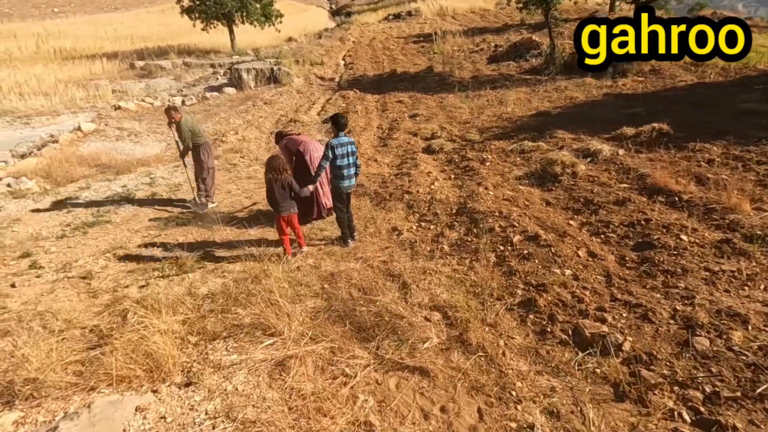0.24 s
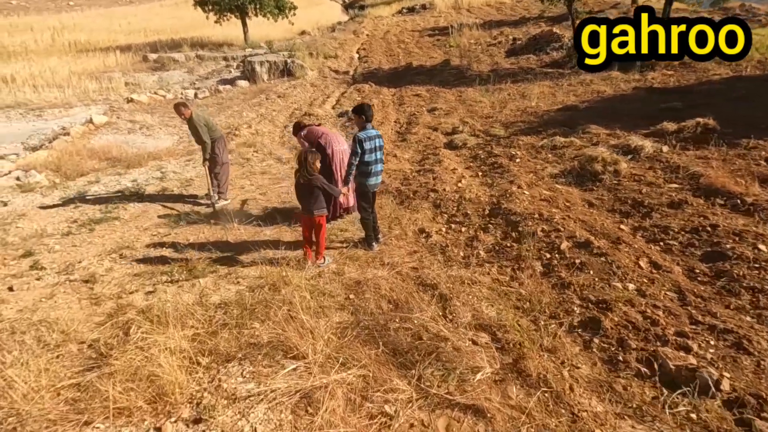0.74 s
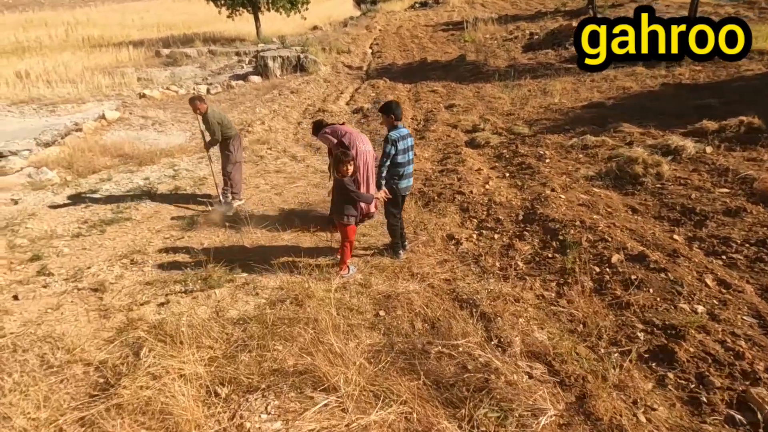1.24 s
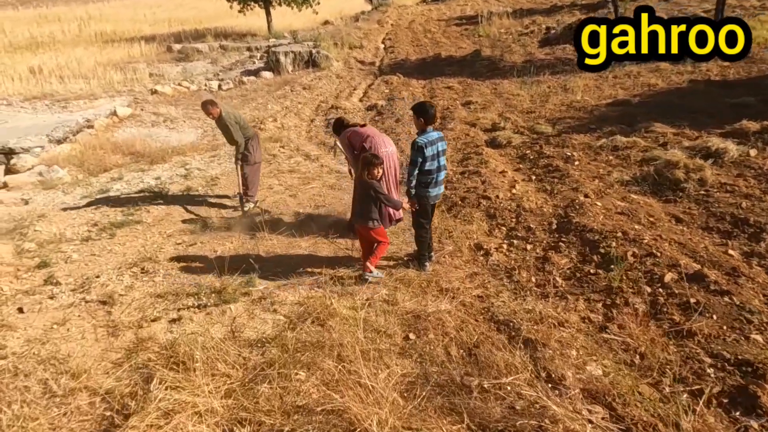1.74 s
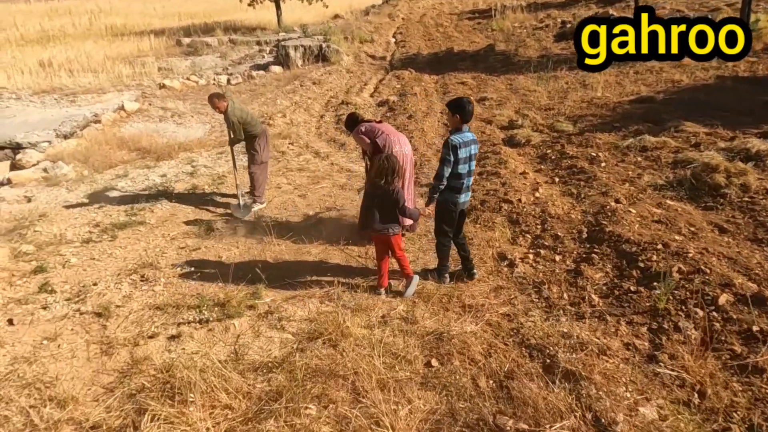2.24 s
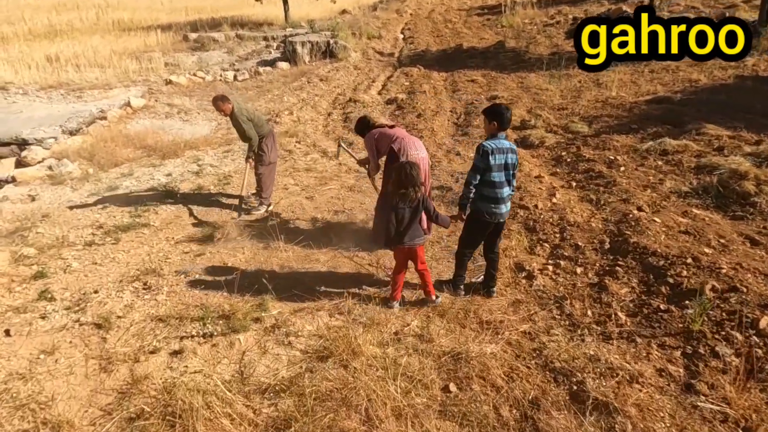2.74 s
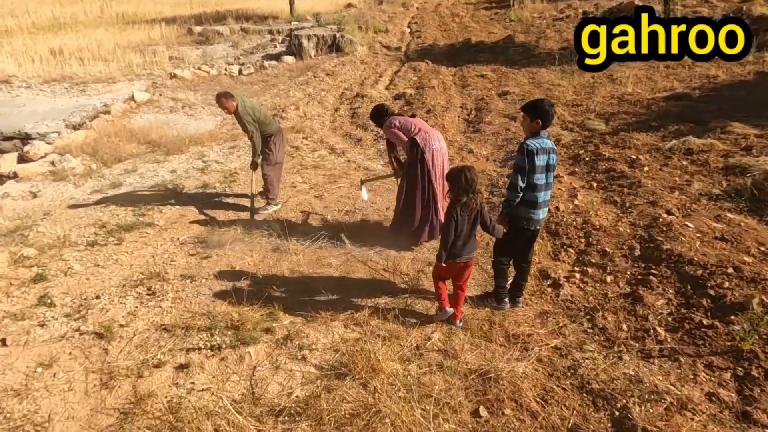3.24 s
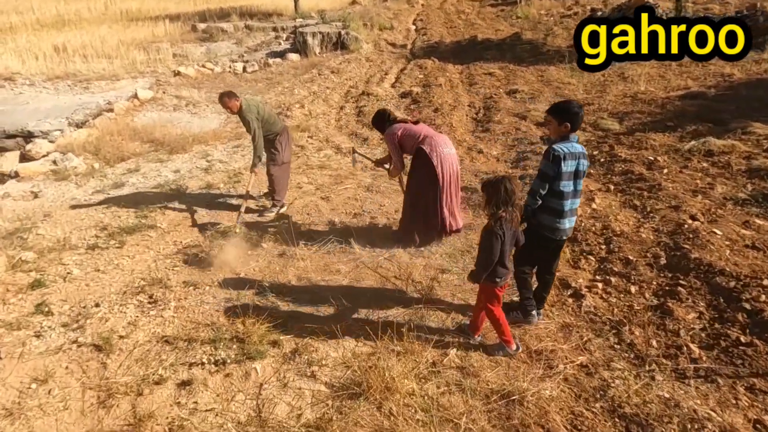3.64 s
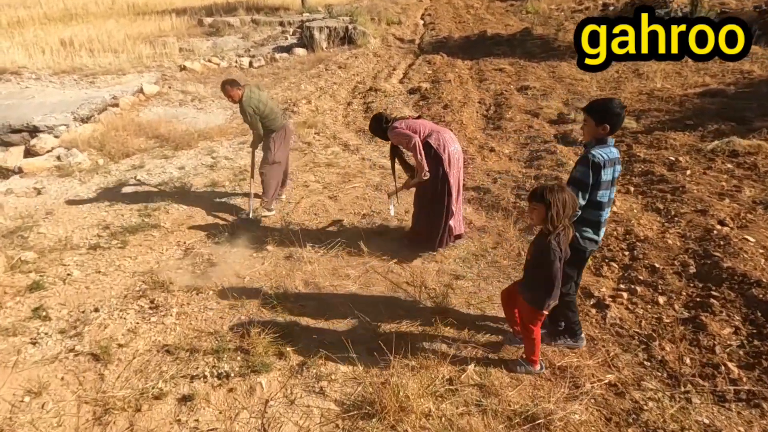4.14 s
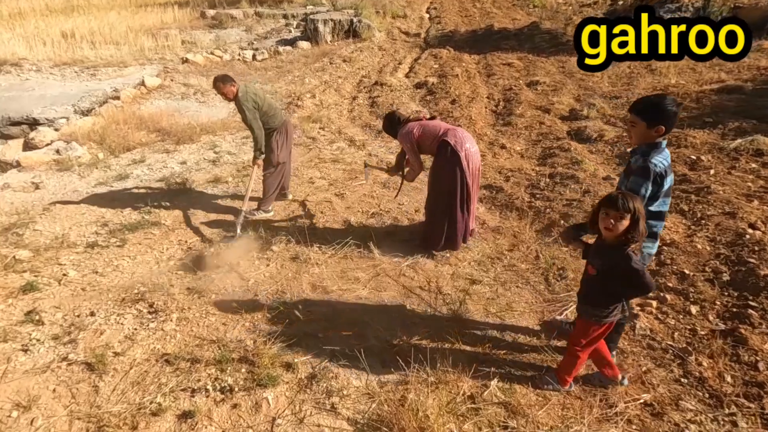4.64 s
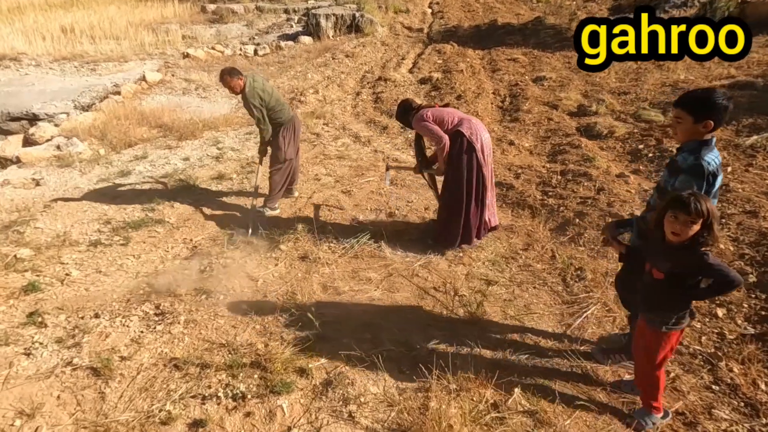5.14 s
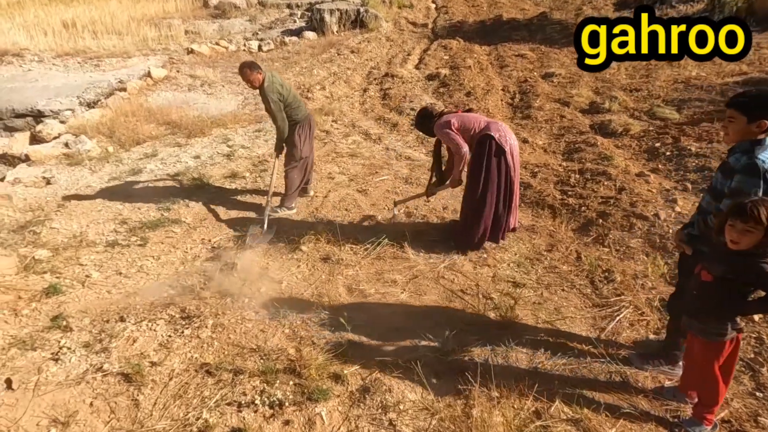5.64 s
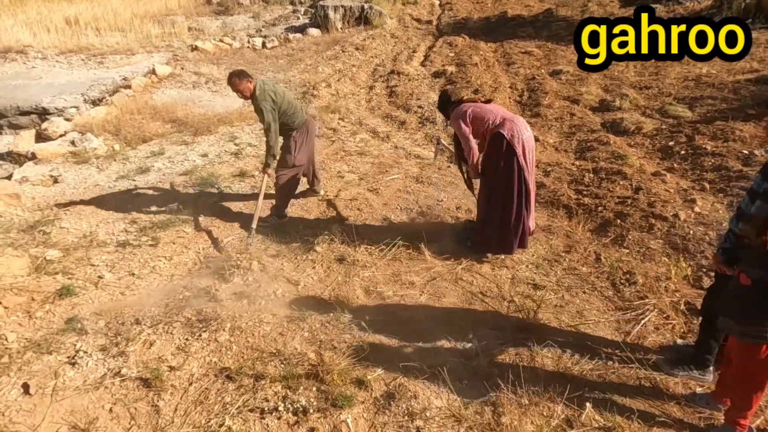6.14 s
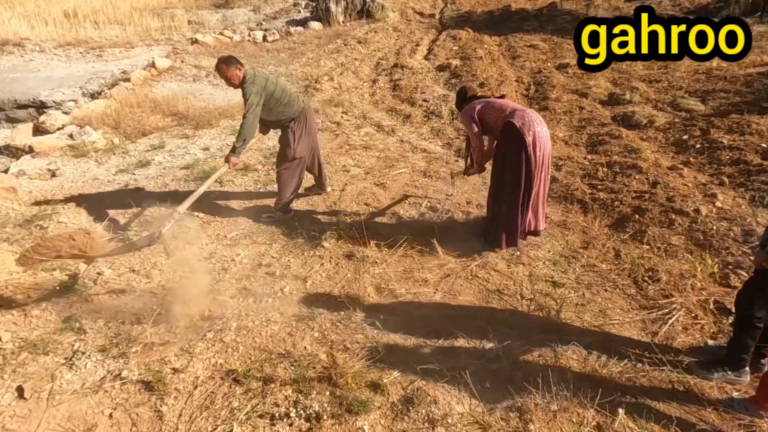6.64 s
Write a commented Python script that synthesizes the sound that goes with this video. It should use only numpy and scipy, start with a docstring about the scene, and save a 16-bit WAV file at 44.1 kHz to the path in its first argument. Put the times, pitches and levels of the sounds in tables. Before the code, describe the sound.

A shovel scrapes into dry stony soil while a hoe chops steadily beside it, with clinking stones and light wind.

```python
"""On an open slope in light wind, a shovel is thrust into dry stony soil and a hoe chops beside it.
Wind rumbles on the microphones and loose earth patters down. Grit and stones knock the steel
blades, which ring freely in the air but only briefly in soil. Each hoe chop crunches,
jolts the wooden shaft and thuds in the ground."""
import sys
import numpy as np
from scipy import signal
from scipy.fft import rfft, irfft, next_fast_len
from scipy.io import wavfile
from scipy.ndimage import uniform_filter1d

SR = 44100
rng = np.random.default_rng(int(sys.argv[2]) if len(sys.argv) > 2 else 0)


def pcm_store(signal):
    """Save signal as 16-bit PCM."""
    levels = np.round(np.clip(np.atleast_2d(signal), -1, 1) * 32767)
    wavfile.write(sys.argv[1], SR, levels.astype(np.int16).T)


N = 304290


def amp(db):
    """Turn decibels into a plain multiplier."""
    return 10 ** (np.asarray(db) / 20)


def evened(x):
    """Scale a signal to an average power of 1."""
    return x / np.sqrt(np.mean(x ** 2) + 1e-20)


def between(ends, share):
    """Slide from the first end (share 0) to the second (share 1)."""
    return ends[0] + (ends[1] - ends[0]) * share


def curve_at(points, hz):
    """Look up a pitch on a curve of (pitch, value) points."""
    pitches, values = np.transpose(points)
    return np.interp(np.log(hz + 1), np.log(pitches + 1), values)


def tone_filter(points, lo_hz=0, hi_hz=30000, size=4096):
    """A filter that follows a tone curve between a soft low edge and a soft high edge."""
    hz = np.fft.rfftfreq(size, 1 / SR) + 1
    gain = amp(curve_at(points, hz)) / np.sqrt((1 + (lo_hz / hz) ** 10) * (1 + (hz / hi_hz) ** 10))
    cepstrum = irfft(np.log(gain + 1e-6))
    cepstrum[1:size // 2] *= 2  # folded so that no sound comes before its cause
    cepstrum[size // 2 + 1:] = 0
    taps = irfft(np.exp(rfft(cepstrum)))
    return taps / np.linalg.norm(taps)


def ring(notes):
    """A tapped object's ring, from (pitch [Hz], level [dB], fade [s]); a fade is a drop of 60 dB."""
    t = np.arange(SR // 2) / SR
    taps = sum((-1) ** k * amp(db - 60 * t / max(fade, .002)) * np.sin(2 * np.pi * hz * t)
               for k, (hz, db, fade) in enumerate(notes))
    return taps / np.linalg.norm(taps)


def through(sound, taps):
    """Pass a sound through a filter or a ringing object."""
    return signal.oaconvolve(sound, taps)[:N]


def grit(per_s, spread_db, hiss):
    """Random clicks of unequal size over a fine hiss."""
    sizes = amp(spread_db * np.minimum(rng.exponential(1, N), 3)) * rng.choice([-1., 1.], N)
    clicks = evened(sizes * (rng.random(N) < per_s / SR))
    return evened(clicks + hiss * rng.standard_normal(N))


def flicker(length_s, depth_db):
    """A volume that wanders at random, changing about once in the given time."""
    span = max(round(length_s * SR), 2)
    wander = uniform_filter1d(uniform_filter1d(rng.standard_normal(N), span), span)
    return amp(depth_db * evened(wander))


def blow(start_s, fade_s, rise_s):
    """Where a blow falls and its shape: a tick, stronger for quick blows, then a rise and a fade."""
    start = round(start_s * SR)
    t = np.arange(1, min(SR // 4, N - start) + 1) / SR
    swell = (1 - np.exp(-t / rise_s)) * amp(-60 * t / max(fade_s, .003))
    tick = 0.59 * min(0.00081 / rise_s, 1) * amp(-60 * t / 0.0012)
    return slice(start, start + len(t)), swell + tick


# How strong the wind is: (time [s], level [dB])
WIND_LEVELS = [(0.0, -43.5), (0.17, -50), (0.35, -49.5), (0.83, -47.5), (1.29, -54.5), (1.52, -39),
               (1.58, -52.5), (3.27, -51), (3.3, -47), (4.17, -57.5), (4.38, -40.5), (4.55, -57.5),
               (5.53, -40), (5.61, -45.5), (5.77, -31.5), (6.3, -51), (6.88, -43.5), (6.9, -38)]
# Tone of the wind: (pitch [Hz], level [dB])
WIND_TONE = [(7.1, 11.5), (12, 7), (81, 4.5), (117, -3.5), (201, -13.5), (321, -58), (400, -36), (520, -77),
             (880, -120)]
def wind():
    """Air rumbles on the microphone openings, more on the right; gusts are lumpy and reach higher."""
    level_db = np.interp(np.arange(N) / SR, *np.transpose(WIND_LEVELS))
    both, left, right = rng.standard_normal((3, N))
    gust = amp(level_db + 0.75 * (level_db + 34) - 9) * flicker(0.029, 1)
    out = np.zeros((2, N))
    for lo_hz, hi_hz, gain in ((0, 42.5, amp(level_db)), (63.6, 750, gust)):
        taps = tone_filter(WIND_TONE, lo_hz, hi_hz, size=16384)
        out += [through(gain * (both + 0.81 * side), taps) for side in (left, right)]
    return out * amp([[-3], [3]])


# The notes a shovel blade rings with: (pitch [Hz], level [dB])
SHOVEL_NOTES = [(945, -18), (1001, -3.5), (1174, -4), (1281, -13), (1394, -7), (1540, -8), (1938, 1.5),
                (2090, 1), (2283, 4.5), (2422, -2), (2670, 1.5), (3106, 3.5), (3380, 4.5), (3640, 5.5),
                (3876, -30), (3990, 8.5), (4222, 3), (4345, -36), (4775, -5.5), (5029, -5), (5360, 4),
                (5830, 12), (6584, 7.5), (7040, -7), (7315, 9), (7900, -0.5)]
def blade_ring(notes, fade_at_2khz_s, damping, treble_cut_db):
    """Struck steel rings with many notes; more damping makes the high ones die sooner."""
    return ring([(hz, db - treble_cut_db * (hz > 5200), fade_at_2khz_s * (2000 / hz) ** damping)
                 for hz, db in notes])


# Earth and straw spilling, and at 3.79 s the shovel scraping lightly over the surface: (start [s], fullest [s],
# end [s], level [dB], dull clods [dB], ring [dB]) The last two add to the level. If "fullest" is outside the
# spill, it only grows or only fades.
SPILLS = [(0.0, -2.2, 0.14, -47, 6, 0), (0.1, 0.4, 0.88, -60.5, -6.5, -18),
          (0.598, 0.5, 0.96, -46, -8.5, -10), (0.97, 1.3, 1.05, -64, 1, 14),
          (1.357, -0.4, 1.65, -48.5, 1, -22), (1.612, 1.766, 1.88, -50.5, -5, -15),
          (1.84, 2.04, 2.1, -48, -15.5, -24), (2.13, 2.5, 2.3, -59.5, 4.5, -20),
          (2.52, 2, 2.91, -50.5, -12.5, -9.5), (3.042, 2.5, 3.36, -63, 3.5, -20),
          (3.416, 1.5, 3.79, -37.5, -11, -10), (3.596, 3.5, 3.97, -50.5, -21, -1.5),
          (3.79, 3, 3.935, -43, -21, 3), (3.93, 4.147, 4.35, -54, -1.5, -3),
          (4.45, 4, 4.72, -41.5, -15, -20), (4.88, 4.5, 5.04, -49.5, -14, -1),
          (5.04, 5.5, 6.1, -60, -42, -15), (5.4, 4.5, 6, -46, -12, 0.5), (5.534, 6.5, 5.91, -47, -13, -16),
          (6.33, 7, 6.49, -41.5, -22, -17), (6.443, 6.5, 7, -45.5, -26, -26)]
# Tone of falling grains: (pitch [Hz], level [dB])
RUSTLE_TONE = [(59, -79), (100, -12.5), (185, -12), (828, -17), (1190, -4.5), (1810, 2.5), (2330, 4.5),
               (7010, 2.5), (9620, -3.5), (10900, -14), (12100, -3.5), (14400, -27), (15600, -74)]
def falling_earth():
    """Grains patter over the rustle of the dry field; some land on the lifted shovel and ring it, and once the
    shovel scrapes lightly over the surface."""
    t, landing = np.arange(N) / SR, np.zeros(N)
    fine, clods = np.full(N, amp(-54)), np.full(N, amp(-71))  # the steady rustle
    for start, fullest, end, db, clods_db, ring_db in SPILLS:
        swell = amp(db) * np.interp(t, (start, fullest, end), (0, 1, 0), 0, 0) ** 0.82
        fine += swell
        clods += swell * amp(clods_db)
        landing += swell * amp(ring_db)
    out = np.zeros((2, N))
    lulls = flicker(.025, 2)  # all grain sizes thin out together
    grain_sizes = ((117, 923, clods), (990, 1440, fine * amp(-12.5)),
                   (1750, 5500, fine * amp(-6.5)), (4900, 32000, fine * amp(-9)))
    for lo_hz, hi_hz, flow in grain_sizes:
        grains = grit(per_s=1500, spread_db=3, hiss=1.4) + .5 * rng.standard_normal((2, N))
        uneven_flow = flow * lulls * flicker(.004, 2.5) * flicker(.04, 2)
        out += [through(uneven_flow * side, tone_filter(RUSTLE_TONE, lo_hz, hi_hz)) for side in grains]
    lifted = blade_ring(SHOVEL_NOTES, .28, damping=.3, treble_cut_db=11)
    trickle = grit(per_s=200, spread_db=8, hiss=.6)
    return out + through(landing * trickle, lifted)


# Stones knocking the shovel: (time [s], level [dB], low crunch [dB], bright grit [dB], ring [dB])
# The last three add to the level.
STONE_KNOCKS = [(0.1996, -32, -32, -8, 3.5), (0.2417, -31.5, -1, -15, -17), (0.5346, -8.5, -38, -4.5, -4.5),
                (0.5826, -9, 0, -4.5, -10), (0.5976, -9.5, -6.5, -1.5, -7), (0.6464, -11.5, -5, -10.5, -20),
                (0.7073, -13.5, -15.5, -9, -9.5), (0.7304, -20.5, -22, -8, -13), (0.7547, -22, -16, -2, -9),
                (0.7645, -28, -19, 4, -9), (0.805, -33.5, -40, 1.5, -25), (0.9929, -33.5, -32, -6, 2),
                (1.08, -41, -40, 4, -25), (1.3434, -24, 3, -16, -5.5), (1.508, -11, -18, -0.5, -13),
                (1.544, -12.5, 0, 1.5, -18), (1.6467, -23.5, -1.5, -27, -13), (1.704, -21.5, -17, -4.5, -4),
                (1.7701, -13, -15.5, -15, -6.5), (1.8147, -25, -15, -26, -8), (1.8598, -14, -25, -39, -8),
                (2.411, -11, -21, -10, -18), (2.4969, -7, -12, -8.5, -18), (2.598, -24.5, -37, -8, -8),
                (2.7098, -22.5, -43, -20, -9), (3.0934, -28, -31, -8, -5), (3.1501, -32, -2.5, -11, -8),
                (3.213, -38, -20, -25, -14), (3.2813, -10.5, -43, -1, -8), (3.3173, -7, -48, -0.5, -2),
                (3.3716, -6, -11, -15, -19), (3.4326, -7.5, -10.5, -28, -6), (3.468, -9.5, -24, -29, -3),
                (3.5054, -23, -25, -5, -1), (3.5617, -28, -29, 3.5, -17), (3.737, -27, -44, -4.5, -12),
                (3.8002, -24, -33, -25, 2), (3.8771, -16.5, -35, -13, -5.5), (4.2588, -22.5, -21, -23, -15),
                (4.2782, -17, -37, -14, -15), (4.2911, -9.5, -45, -10, -13), (4.3184, -10, -39, -3, -15),
                (4.358, -8, -15, -4.5, -9), (4.5206, -18.5, -28, -25, -6), (4.5352, -10, -28, -24, -10.5),
                (4.5749, -13, -25.5, -9.5, -8.5), (4.6348, -23, -35, -11, -18),
                (4.655, -26.5, -37, -11, -5), (4.6814, -44, -22, -11, -12), (4.7157, -28.5, -17, -18, -2),
                (4.7838, -31.5, -3.5, -20, -5), (4.8314, -13.5, -38, -1.5, 0),
                (4.9824, -26.5, -5.5, -20, -9), (5.0098, -29.5, -5.5, -21, -6.5), (5.13, -38, -30, -1, -15),
                (5.221, -9, -39, -2, -15), (5.3083, -4, -24, -12, -8), (5.4849, -25, -43, -3.5, 0),
                (5.5631, -26.5, -26, -5, -15), (5.5934, -16, -16, -12.5, -3.5), (5.708, -23, -42, -10, -9),
                (6.0568, -11, -46, -30, 0.5), (6.125, -7, -28, -26, -16), (6.161, -5.5, -14, -27, -1),
                (6.1934, -4, -24, -19, -8), (6.334, -5.5, -22, -29, -4), (6.4075, -11.5, -37, -19, -13),
                (6.6243, -23, -34, -24, -24), (6.6653, -20, -36, -11.5, -20), (6.7012, -24, -24, -13, -14),
                (6.7209, -24, -20, -14, -16), (6.768, -31, -27, 5, -21), (6.777, -30, -38, 4, -28),
                (6.7905, -11.5, -39, -14.5, -10), (6.85, -28, -40, 0.5, -18), (6.88, -32.5, -40, -3, -20)]
# Tone of crunching soil: (pitch [Hz], level [dB])
CRUNCH_TONE = [(47, -75), (80, -8), (152, -4), (351, -10), (637, -2), (831, -9), (948, 1), (1410, 1.5),
               (2010, 5), (2860, 4), (4250, -2.5), (9840, -20), (12500, -30), (14600, -44), (15600, -112)]
def shovel():
    """Grit drags along the buried blade and single stones knock it; soil muffles the ring."""
    force, depth = shovel_thrusts()
    stones = amp(-1.5) * pebbles(force, per_s=65, fade_at_2khz_s=0.047)
    stick_and_slip = evened(grit(per_s=2500, spread_db=3.5, hiss=.9) * flicker(.004, 2.2))
    scrape = force * stick_and_slip
    low = scrape * amp(between((-23.5, 4), depth)) * flicker(0.0038, 1.34)  # deeper sounds duller
    middle = scrape * amp(-2.5)
    bright = scrape * amp(between((2, -4.5), depth))
    buried, spots = scrape.copy(), np.zeros((4, N))
    noise = rng.standard_normal(N)
    for k, (time, db, low_db, bright_db, ring_db) in enumerate(STONE_KNOCKS):
        sunk = depth[round(time * SR)]
        # big stones grind longer, and soil softens the blow
        at, shape = blow(time, 0.033 * amp(0.39 * db), rise_s=between((0.0005, 0.002), sunk))
        for layer, share_db in ((low, low_db), (middle, -8), (bright, bright_db),
                                (spots[k % len(spots)], ring_db - 5.3 * sunk), (buried, ring_db - 9)):
            layer[at] += amp(db + share_db) * shape * noise[at]
    out = through(low, tone_filter(CRUNCH_TONE, 104, 980))
    out += through(middle, tone_filter(CRUNCH_TONE, 940, 4730))
    out += through(bright, tone_filter(CRUNCH_TONE, lo_hz=5340))
    for k in range(6):  # the moving contact favours now these notes, now those
        muffled = blade_ring(SHOVEL_NOTES[k::6], .05, damping=.4, treble_cut_db=5)[:6000]
        out += through(buried * evened(flicker(.035, 5)) / np.sqrt(6), muffled)
    for spot in spots:  # each spot on the blade wakes the notes unequally
        notes = [(hz * rng.normal(1, .005), db + rng.normal(0, 4)) for hz, db in SHOVEL_NOTES]
        out += through(spot, blade_ring(notes, .1, damping=.6, treble_cut_db=6))
    return out + stones


# Hoe chops: (time [s], level [dB], crunch length [s], thud [dB], bright grit [dB], graze lead [s],
# graze [dB], jolt delay [s], blade jolt [dB], shaft jolt [dB]). Later dB columns add to the level.
HOE_CHOPS = [(0.418, -16.5, 0.055, -15.5, -32, 0.0077, -5, 0.02, -26, -7),
             (1.262, -19.5, 0.12, -9.5, -13.5, 0.002, -33, 0.038, -2.5, -11),
             (2.117, -22, 0.15, -6, -21.5, 0.016, 5, 0.025, 1, -31),
             (3.027, -10, 0.041, -10.5, -9, 0.002, -33, 0.0087, -11, -14.5),
             (3.929, -10.5, 0.051, -15.5, -15, 0.0018, -28, 0.0029, -9, -4),
             (4.849, -14, 0.035, -19, -6, 0.002, -28, 0.0374, -9, -31),
             (5.752, -18, 0.08, -14.5, -19.5, 0.002, -30, 0.046, -1, -46),
             (6.798, -6, 0.032, -10, -16.5, 0.0086, -28, 0.035, -11.5, -43.5)]
# Pebbles glancing off the raised hoe: (time [s], level [dB])
HOE_PINGS = [(0.4124, -33), (2.11, -27), (4.044, -29.5), (5.9078, -34), (5.9303, -46)]
# Notes of the hoe blade, where wider ones die sooner: (pitch [Hz], width [Hz], level [dB])
HOE_NOTES = [(1213, 100, 16.5), (2280, 72, -2), (2934, 54, -1), (3120, 470, 6.5), (5970, 73, -3),
             (9810, 67, -13.5)]
# Notes of the wooden shaft: (pitch [Hz], level [dB], fade [s])
SHAFT_NOTES = [(470, -0.5, 0.008), (640, -6, 0.006)]
# Notes of the thudding ground: (pitch [Hz], level [dB], fade [s])
GROUND_NOTES = [(72, -11.5, 0.16), (96.5, -5, 0.22), (151, -1.5, 0.1), (209, -3.5, 0.062)]
def hoe():
    """The blade grazes, crunches, then jolts its shaft; the ground thuds just after the blow."""
    graze_s, jolt_s = 0.029, 0.041
    crack, knock, bright, shove, ping = np.zeros((5, N))
    noise = grit(per_s=3000, spread_db=4, hiss=0.91)
    for time, db, crunch_s, thud_db, bright_db, lead, graze_db, delay, jolt_db, shaft_db in HOE_CHOPS:
        graze = (time - lead, graze_s, ((crack, graze_db - 10), (bright, graze_db - 18)))
        crunch = (time, crunch_s, ((crack, -7), (knock, -20.5), (bright, bright_db)))
        jolt = (time + delay, jolt_s, ((crack, jolt_db - 9), (bright, jolt_db - 49), (knock, shaft_db)))
        for start, length, shares in (graze, crunch, jolt):
            at, shape = blow(start, length, rise_s=0.0023)
            for layer, share_db in shares:
                layer[at] += amp(db + share_db) * shape * noise[at]
        shove[round((time + .008) * SR)] += amp(db + thud_db + 23.5)  # spread over a long ring
    for time, db in HOE_PINGS:
        at, shape = blow(time, fade_s=0.019, rise_s=0.00043)
        ping[at] += amp(db) * shape * noise[at]
    steel = [(hz, db, 2.2 / max(width, 260 * (hz < 2000))) for hz, width, db in HOE_NOTES]
    edge = [(hz, db, fade) for hz, db, fade in steel if fade > .018]  # only the thin edge rings on
    blade = through(crack, ring(steel)) + through(ping, ring(edge))
    soil = amp(-2) * through(crack, tone_filter(CRUNCH_TONE, 1350, 2770))
    soil += through(bright, tone_filter(CRUNCH_TONE, lo_hz=4450))
    shaft = through(knock, ring(SHAFT_NOTES)[:4096] + 1.3 * tone_filter(CRUNCH_TONE, 233, 714))
    return blade + soil + shaft + through(shove, ring(GROUND_NOTES))


# Pushes of the shovel: (goes in [s], deepest [s], comes out [s], force going in [dB],
# force at deepest [dB], easing by the end [dB], depth reached [0-1])
THRUSTS = [(0.506, 0.576, 0.68, -46.5, -28, -14, 0.86), (1.505, 1.571, 1.656, -25.5, -34, -27.5, 1),
           (2.414, 2.451, 2.465, -19, -27, -12, 0.74), (2.461, 2.499, 2.565, -25.5, -31.5, -39, 0.98),
           (3.279, 3.378, 3.413, -28.5, -26.5, -16, 1), (3.404, 3.426, 3.49, -39, -31.5, -6, 0.97),
           (4.298, 4.368, 4.513, -31, -24.5, -11.5, 0.7), (4.789, 4.858, 4.92, -49.5, -39, -6.5, 0.83),
           (5.217, 5.276, 5.397, -25, -25.5, -11.5, 0.89), (6.041, 6.113, 6.218, -35, -23.5, -9, 0.41),
           (6.218, 6.264, 6.394, -31.5, -30.5, -9.5, 0.8)]
def shovel_thrusts():
    """Force and depth of the blade: it sinks, then rises a little as the push eases off."""
    t = np.arange(N) / SR
    force, depth = np.zeros((2, N))
    for enter, deepest, leave, entry_db, deepest_db, ease_db, reach in THRUSTS:
        sink = np.clip((t - enter) / (deepest - enter), 0, 1)
        rise = np.clip((t - deepest) / (leave - deepest), 0, 1)
        in_soil = np.clip(np.minimum(t - enter, leave - t) / 0.0049, 0, 1)
        force += in_soil * amp(between((entry_db, deepest_db), sink) + ease_db * rise ** 1.47)
        depth += in_soil * reach * sink * between((1, 0.73), rise)
    return force, depth


def pebbles(force, per_s, fade_at_2khz_s, sizes=10):
    """Pushed stones clink: each size has its own short ring and its own scattered knocks."""
    out = np.zeros(N)
    for hz in np.geomspace(900, 9000, sizes) * rng.uniform(1, 1.045, sizes):
        knocks = amp(4.1 * np.minimum(rng.exponential(1, N), 3)) * (rng.random(N) < per_s / SR)
        fade_s = fade_at_2khz_s * (2000 / hz) ** .5
        decay, turn = amp(-60 / (fade_s * SR)), 2 * np.pi * hz / SR  # per sample
        clink = signal.lfilter([1], [1, -2 * decay * np.cos(turn), decay ** 2], knocks)
        out += evened(clink) * amp(curve_at(CRUNCH_TONE, hz)) * np.sqrt(hz / 2000)
    return force * out / np.sqrt(sizes)


# Stones striking the lifted shovel:
# (time [s], level [dB], main pitch [Hz], fade [s], rough drop away from that pitch [dB per octave])
BLADE_CLINKS = [(0.7304, -30, 3876, 0.12, -60), (0.9935, -44, 4700, 0.26, -60),
                (0.9925, -45, 2422, 0.3, -32), (1.7701, -33.5, 4300, 0.22, -62),
                (1.8596, -23, 2700, 0.22, -7), (3.799, -32.5, 3070, 0.3, -16),
                (4.5748, -11.5, 5700, 0.016, -30), (4.8322, -23.5, 4140, 0.25, -120),
                (4.852, -27, 7900, 0.035, -30), (5.4862, -37.5, 2050, 0.27, -44),
                (5.5924, -26, 2900, 0.39, -11), (5.707, -33.5, 3640, 0.3, -16)]
def blade_clinks():
    """Each strike wakes the blade's notes near one pitch, and those further off weakly and unevenly."""
    out = np.zeros(N + SR)
    unevenness = 0.66 + rng.random((len(BLADE_CLINKS), len(SHOVEL_NOTES)))
    for (time, db, main_hz, fade, drop_db), weights in zip(BLADE_CLINKS, unevenness):
        clink = ring([(hz, drop_db * abs(np.log2(hz / main_hz)) * weight, fade)
                      for (hz, _), weight in zip(SHOVEL_NOTES, weights)])
        out[round(time * SR):][:len(clink)] += amp(db) * clink / abs(clink).max()
    return out[:N]


# Single puffs of wind: (time [s], level [dB])
PUFFS = [(1.484, -59), (5.701, -29), (5.734, -25), (5.764, -22), (5.834, -20), (5.885, -30)]
def wind_puffs():
    """Each puff pushes on the microphone openings for one and a half slow swings, more on the right."""
    puff_hz = 64
    out, t = np.zeros(N), np.arange(N) / SR
    for time, db in PUFFS:
        swings = np.clip((t - time) * puff_hz, 0, 1.5)
        out += amp(db) * np.sin(2 * np.pi * swings) * np.sin(np.pi * swings / 1.5)
    return out * amp([[-4], [3]])


def on_slope(sound, pan_db):
    """The direct sound plus a brief scatter off the rough ground, different at each ear."""
    t = np.arange(3000) / SR
    echoes = rng.standard_normal((2, len(t))) * amp(-60 * t / 0.026) * (t > .001)
    echoes = np.diff(np.diff(echoes, prepend=0), prepend=0)  # clods scatter treble more than bass
    scatter = signal.oaconvolve(sound[None], echoes / np.linalg.norm(echoes[0]), axes=1)[:, :N]
    return sound * amp([[pan_db / 2], [-pan_db / 2]]) + amp(-6) * scatter


def scene():
    """The shovel in the middle and the hoe a little to the right, with falling earth and wind."""
    tools = on_slope(shovel() + blade_clinks(), pan_db=0) + on_slope(hoe(), pan_db=-1.5)
    return tools + falling_earth() + wind() + wind_puffs()


# How much louder the left microphone is: (pitch [Hz], left minus right [dB])
LEFT_LOUDER = [(60, 3), (240, -1), (950, 0.5), (3770, 0.5), (15000, 3.5)]
# How far the left microphone runs ahead: (pitch [Hz], lead [radians])
LEFT_AHEAD = [(100, -0.11), (700, -0.41), (2700, -0.63), (8000, -0.39), (11000, -0.59)]
def record(dry):
    """Two microphones hear slightly different levels and timing; the highest treble is cut off."""
    size, top_hz = next_fast_len(N), 15800
    hz = np.fft.rfftfreq(size, 1 / SR)
    left = amp(curve_at(LEFT_LOUDER, hz) / 2) * np.exp(.5j * curve_at(LEFT_AHEAD, hz))
    pair = irfft(rfft(dry, size) * np.array([left, 1 / left]), size)[:, :N]
    treble_cut = signal.firwin(511, top_hz, window=("kaiser", 9), fs=SR)
    return signal.oaconvolve(pair, treble_cut[None], "same")


dry = scene()
out = record(dry)
pcm_store(out)
```